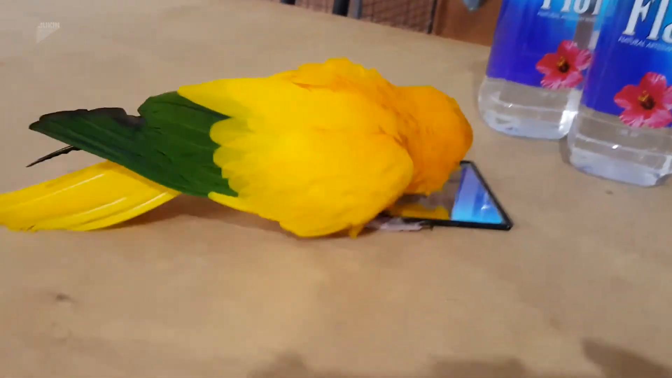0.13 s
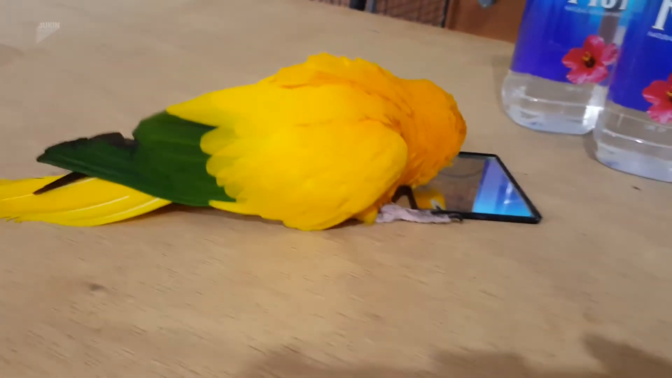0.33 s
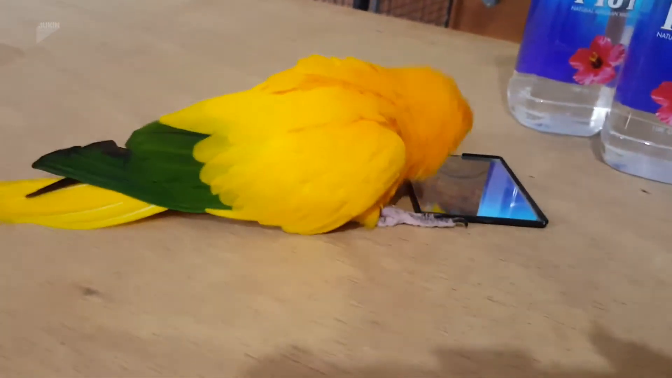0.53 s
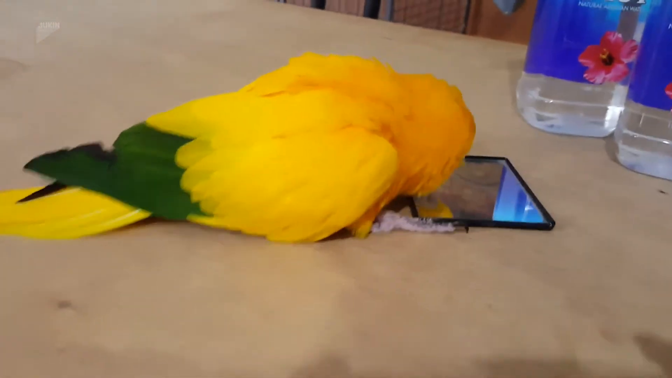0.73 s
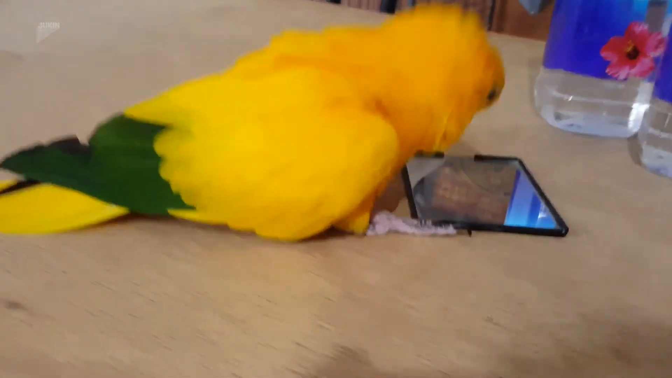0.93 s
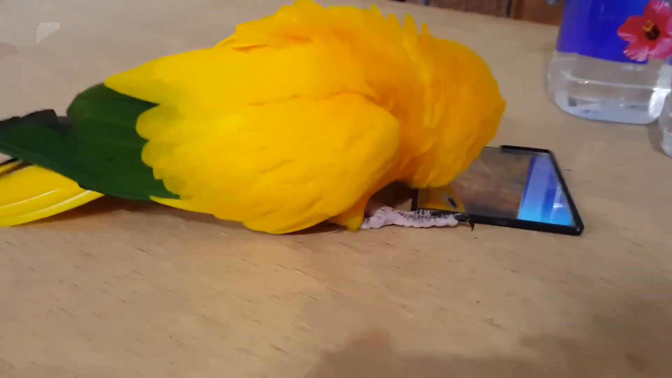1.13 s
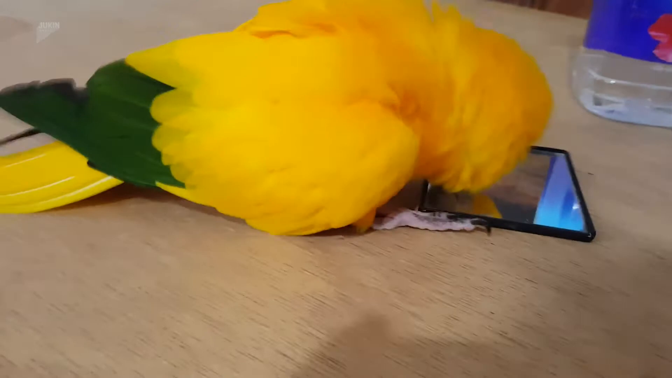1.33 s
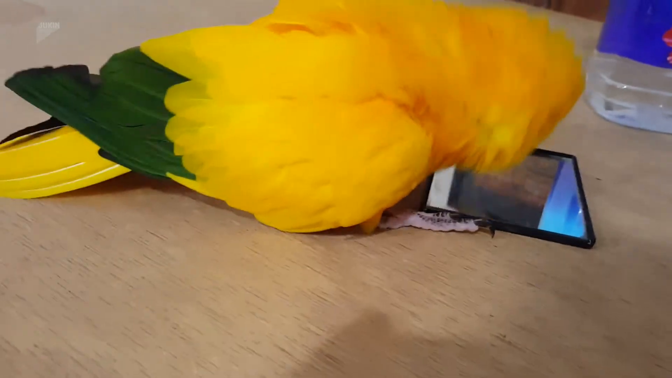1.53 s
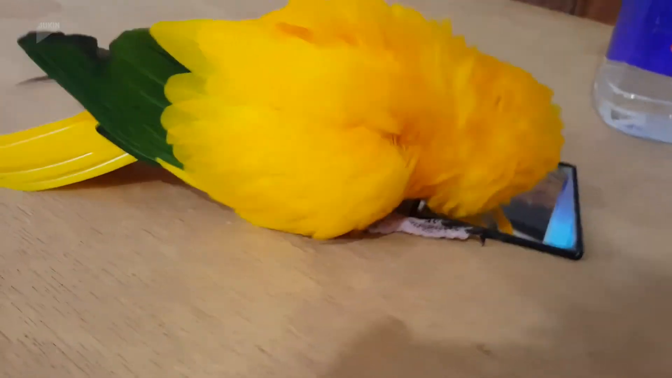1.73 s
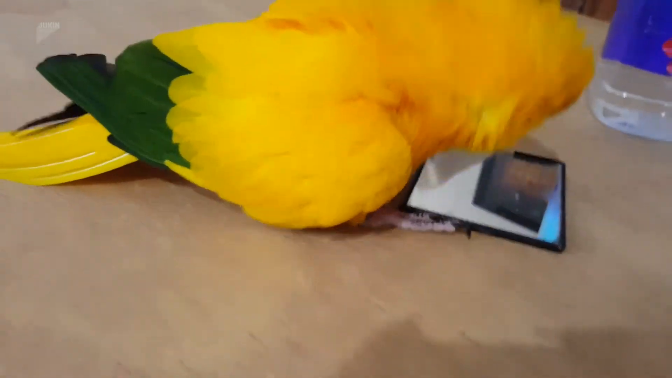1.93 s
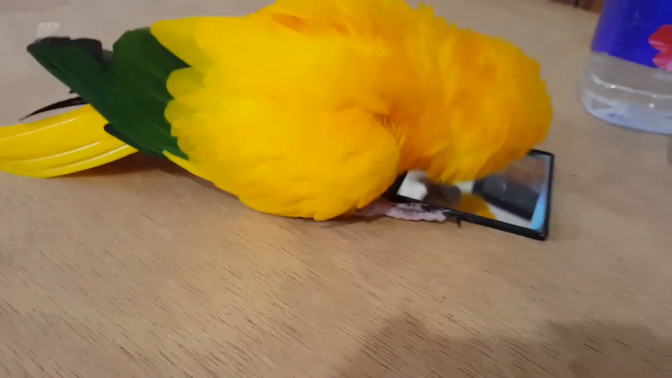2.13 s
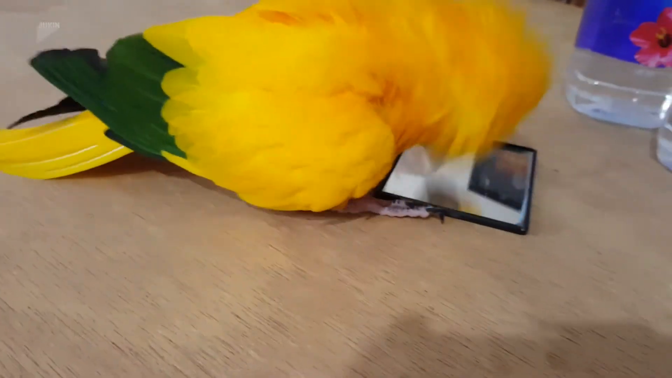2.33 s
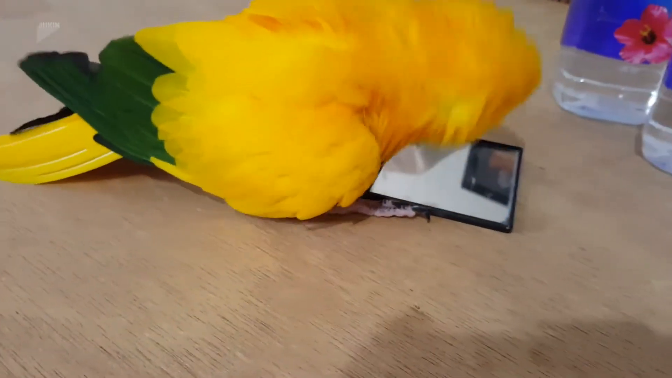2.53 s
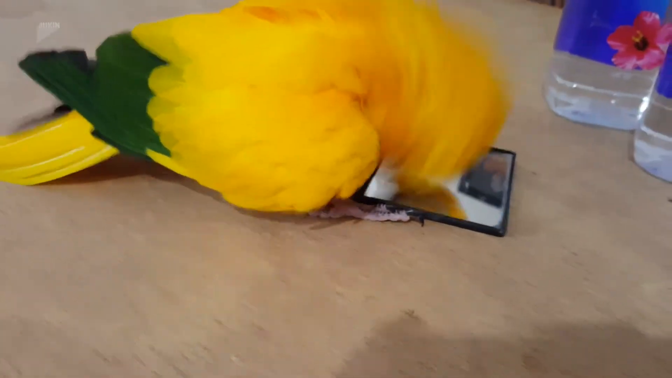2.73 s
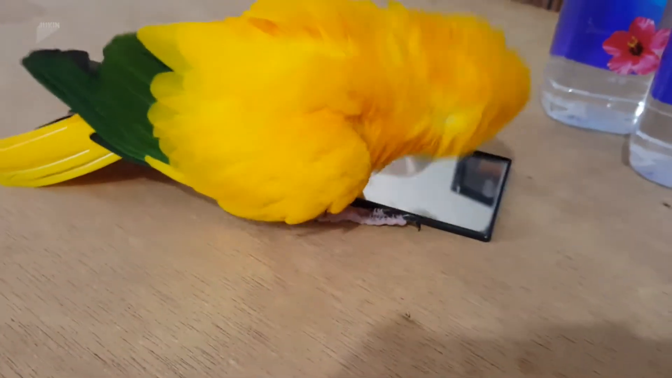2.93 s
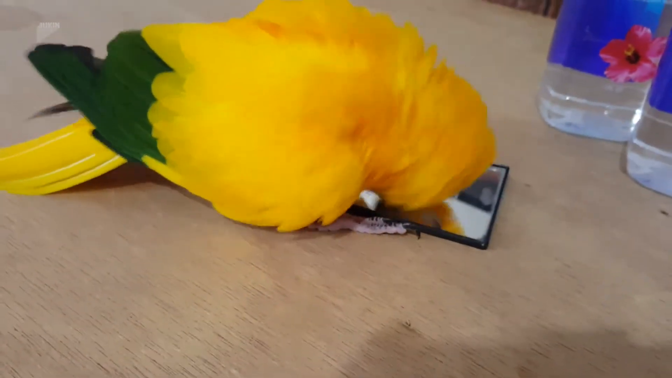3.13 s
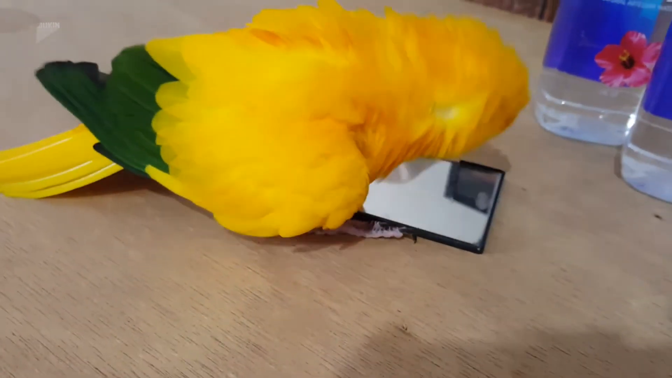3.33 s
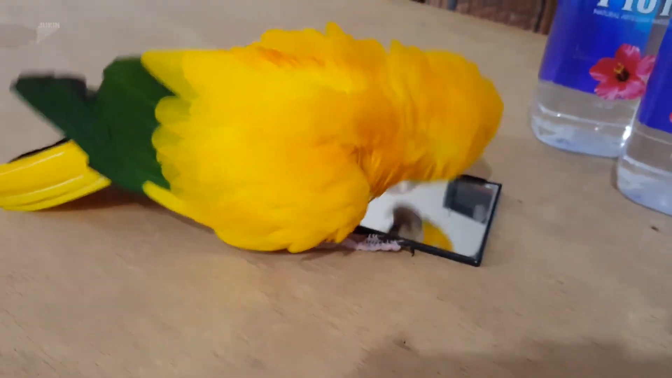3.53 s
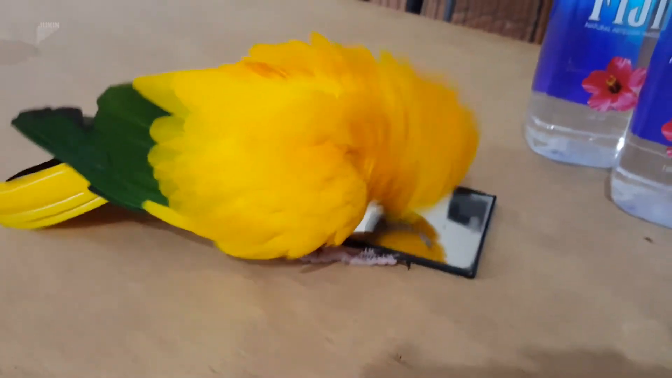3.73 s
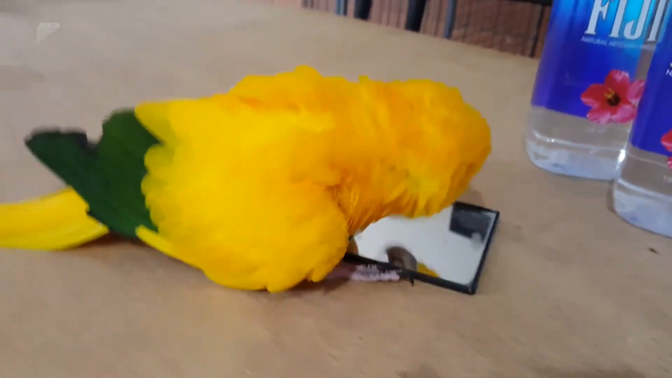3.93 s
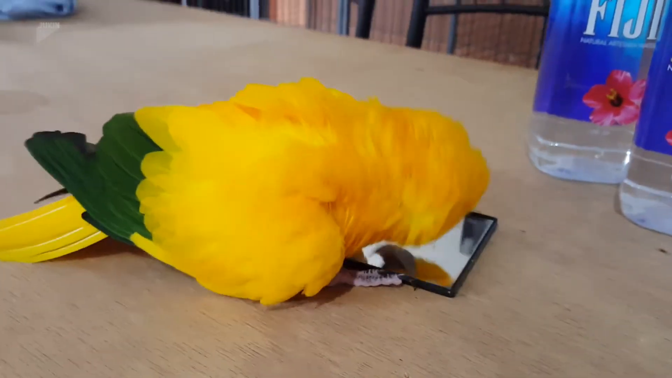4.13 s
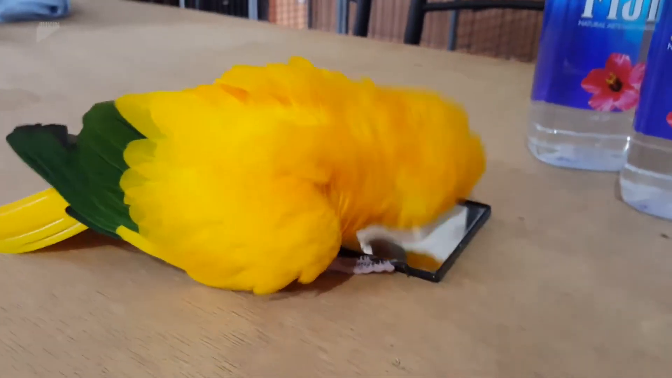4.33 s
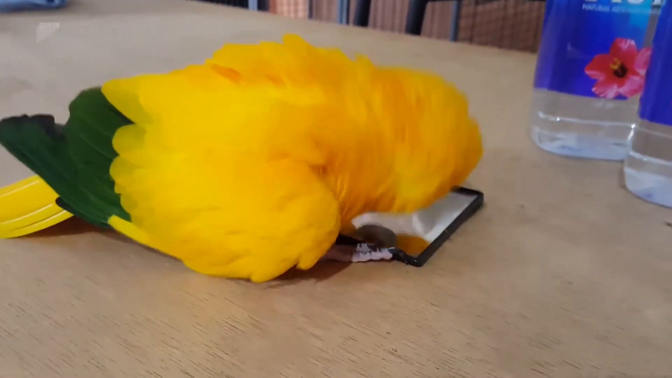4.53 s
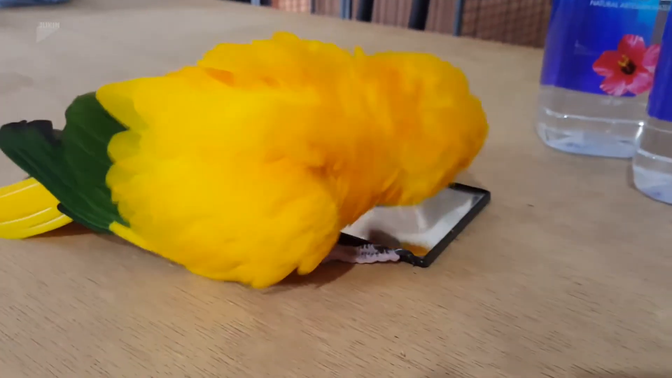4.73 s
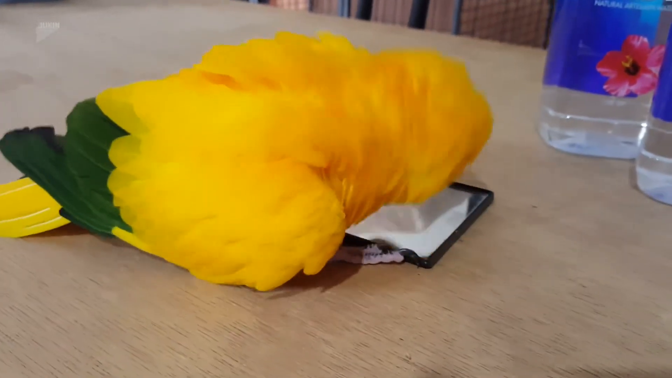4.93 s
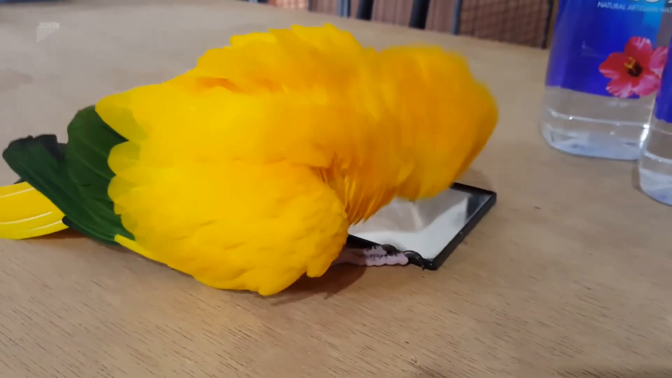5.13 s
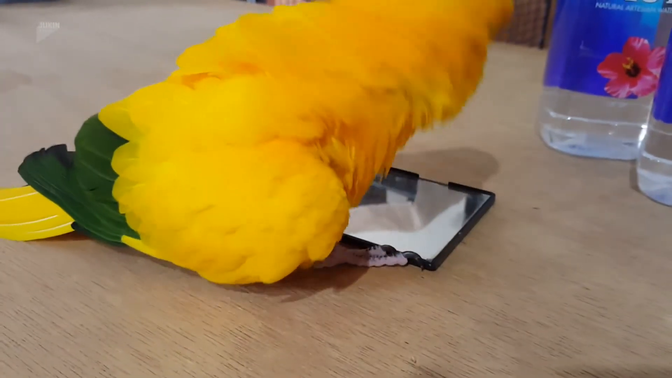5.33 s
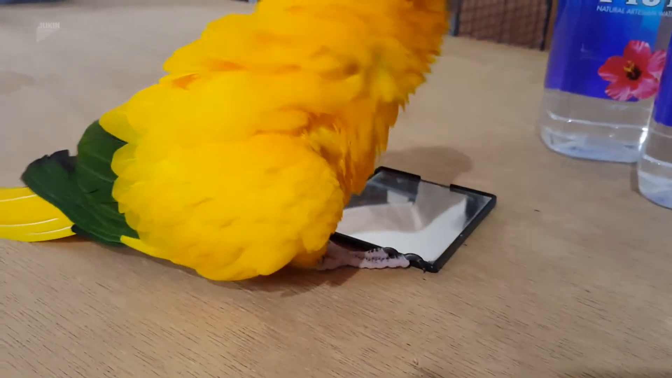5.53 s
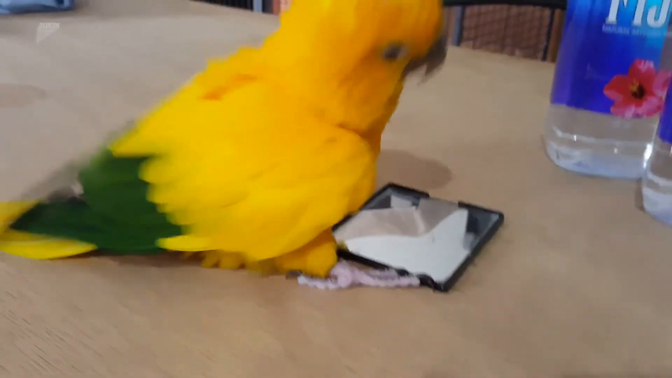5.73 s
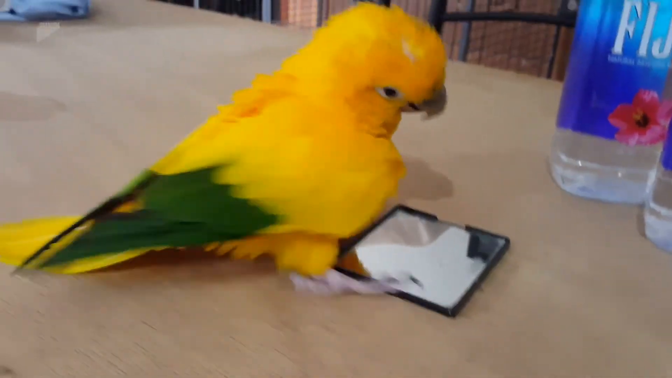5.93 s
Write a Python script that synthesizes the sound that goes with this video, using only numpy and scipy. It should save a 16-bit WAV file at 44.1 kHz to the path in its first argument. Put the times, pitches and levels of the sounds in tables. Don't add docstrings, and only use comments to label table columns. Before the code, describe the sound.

Close up in a bare, lively room, a parrot shuffles on a wooden table with faint claw ticks and beak nips. A small mirror tips and its back clatters on the wood. Sharp beak raps follow about three a second, clicking glass and frame over short table thumps. A faint peep slips between late raps, then one squawk. A distant appliance hums throughout, picked up by a hand-held stereo device at arm's length.

```python
import sys
import numpy as np
from scipy import signal
from scipy.fft import rfft, irfft, next_fast_len
from scipy.io import wavfile

SR = 44100
rng = np.random.default_rng(int(sys.argv[2]) if len(sys.argv) > 2 else 0)


def generate_wav(signal):
    frames = np.transpose(np.atleast_2d(signal))
    scaled = np.clip(frames, -1, 1) * 32767
    pcm = np.round(scaled).astype(np.int16)
    wavfile.write(sys.argv[1], SR, pcm)


N = 268172
GRID = 8192

# start in seconds, peak in dB, table thump in dB,
# hardness of the contact in dB, spot on the glass from centre (-1) to rim (1).
RAP_BLOWS = [(1.4216, -8, 3, -11.5, -1.62), (1.7533, -4, 1.3, -3.5, 0.39), (2.0967, -5.5, 3, 5.5, -0.86),
             (2.4445, -5.5, -3.5, -3, 0.61), (2.8229, -5.5, -1, 7.5, -0.32),
             (2.8374, -15.5, 10.5, -13, -0.85), (3.1773, -2.5, -3, 2.5, -0.15), (3.551, -6, -3, 0.5, 0.045),
             (3.8207, -11, 5, 13.5, -0.33), (4.0697, -10, 4.5, -1, -0.052), (4.2963, -14.5, 0, -5, 0.73),
             (4.3155, -37, 22.5, 10, 0.062), (4.352, -40, 10, 3.5, 0.66), (4.5, -12, 3.5, 11, 0.74),
             (4.6909, -12, 1.5, 2, 0.22), (4.9, -20, 9.5, 1.5, 0.3), (4.9203, -39.5, 21.5, 3, 0.31),
             (5.1192, -24.5, 4, -7, -0.41)]
# pitch in Hz, level in dB, t60 in seconds, left-right in dB.
TABLE_MODES = [(122.8, -19.5, 0.093, 1), (166.6, -25, 0.37, 0), (223.7, -30.5, 0.12, -1.5),
               (252.5, -20, 0.082, 3), (410, -23, 0.055, -0.5), (474, -16.5, 0.034, 0.5),
               (525.6, -16, 0.057, 3), (590.3, -22.5, 0.13, 1), (673, -19, 0.051, 1),
               (779, -23.5, 0.053, -4.5), (1050, -17.5, 0.016, 3)]
# time in seconds, left-right in dB, edge facing the ports in dB,
# rim facing the ports in dB.
DEVICE_AIM = [(0, 1, -1, 5), (1.1, -6, -5.5, 2.5), (1.42, -4.5, 10, 4.5), (1.75, -3, 4, 11),
              (2.1, -3.5, -5, 10), (2.8, -4.5, -1, 12), (3.2, -2, -8.5, 0.5), (3.55, -6.5, -7, 4.5),
              (3.85, -4, 1, 7), (4.3, -6, 1.5, -16), (4.55, -6.5, 5, 12), (4.9, -5, 3, 0),
              (6.08, -7.5, 2, -3)]


def from_db(db):
    return np.exp(np.asarray(db) * (np.log(10) / 20))


def rms_one(x):
    return x / np.sqrt(np.mean(x ** 2) + 1e-20)


def in_time(rows):
    s, *columns = np.transpose(rows)
    return [np.interp(np.arange(N) / SR, s, c) for c in columns]


def at_hz(points, hz):
    table_hz, values = np.array(points)[:, 0], np.array(points)[:, 1]
    return np.interp(np.log(np.maximum(hz, 1)), np.log(table_hz), values)


def governed_db(rows, ranges_hz, s, hz):
    times, *columns = np.transpose(rows)
    return sum((low <= hz < high) * np.interp(s, times, c) for (low, high), c in zip(ranges_hz, columns))


def drift(rate):
    r = np.exp(-80 * np.pi * rate / SR)
    slow = signal.lfilter([1], [1, -2 * r, r * r], rng.standard_normal(N // 40 + 2002))[2000:]
    return np.interp(np.arange(N) / 40, np.arange(len(slow)), rms_one(slow))


def ring(clicks, hz, t60):
    r = from_db(-60 / (t60 * SR))
    w = 2 * np.pi * hz / SR
    return signal.lfilter([0, np.sin(w)], [1, -2 * r * np.cos(w), r * r], clicks + 1e-18)


def causal(gain):
    cepstrum = irfft(np.log(gain), GRID)
    cepstrum[..., 1:GRID // 2] *= 2
    cepstrum[..., GRID // 2 + 1:] = 0
    return irfft(np.exp(rfft(cepstrum)), GRID)


def diffuse(size):
    # frequency in Hz, left-right likeness of diffuse sound from -1 to 1.
    likeness = [(25, .85), (60, 0.98), (290, 0.91), (640, 0.43), (1400, -0.13), (15000, -0.059)]
    hz = np.fft.rfftfreq(size, 1 / SR)
    mid, side = rfft(rng.standard_normal((2, size)))
    alike = np.clip(at_hz(likeness, hz), -1, 1)
    return hz, np.sqrt(1 + alike) * mid + np.sqrt(1 - alike) * side * [[1], [-1]]


def wash(spectrum):
    size = next_fast_len(N, real=True)
    hz, pair = diffuse(size)
    return rms_one(irfft(pair * from_db(at_hz(spectrum, hz)), size)[:, :N])


def strikes(rows, scatter_db, back_db, room_db):
    # pitch in Hz, level in dB, t60 in seconds, left-right in dB.
    back_modes = [(1228, -6.5, 0.025, 3), (1572, -9, 0.037, 10.5)]
    frame_modes = [(1900, -5, 0.013, -1), (2250, -5, 0.022, 1), (2388, 4, 0.0064, -5.5),
                   (2896, 8.5, 0.0046, -4)]
    middle_modes = [(4040, -6.5, 0.0056, 4.1)]
    glass_modes = [(4880, -3.5, 0.0069, -10.5), (5550, -12.5, 0.008, 0.5), (6300, -8, 0.0032, 2.5)]
    rim_modes = [(7440, -12.5, 0.006, 5), (8280, -11, 0.0061, -1.5)]
    edge_modes = [(9800, -3, 0.00088, 12), (11000, -9, 0.0039, -18), (12240, -5, 0.0044, -4.5),
                  (16000, 3, 0.005, -6.5)]
    flank_modes = [(2663, -10, 0.01, 0), (3350, -10, 0.0032, 4)]

    # time in seconds, low frame, mid frame, high frame and middle in dB.
    beam = [(1.08, 5.5, 0, -1, 0), (1.42, 2, 1.5, 5.5, -4.5), (1.75, -1.5, -5.5, 2.5, 0),
            (2.1, -3.5, -1, -0.5, -5.5), (2.44, -2, -5, 2.5, 0), (2.82, 2.5, 1.5, 2, 3),
            (3.18, 0, 0.5, 2.5, 2.5), (3.55, 0.5, 1, 2.5, -2), (3.82, -6.5, -7, -3, 5),
            (4.07, -1.5, -1, 4.5, -6), (4.3, 2, 5, 5.5, 4), (4.5, -3, 1.5, 1, 7), (4.69, -3, 9.5, -2, 8.5),
            (4.9, -1.5, 3.5, 3, -4), (5.12, 1, 3, 1.5, -8.5)]
    # time in seconds, upper table knock, back, frame, upper glass in dB.
    spill = [(1.08, 6, 3, -0.5, -3), (1.42, 4.5, 4.5, -3, -1.5), (1.75, 0.8, 2.5, -3, 4),
             (2.1, 4, 3.5, -2.5, -14), (2.44, -13, 1.5, -3.5, 3.5), (2.82, 3, 3.5, -2.1, 3.5),
             (3.18, 3.5, 1, -1, 4), (3.55, -6.5, 1.5, -1, 4.5), (3.82, -13.5, 3.5, -1.5, 6),
             (4.07, 1, 4, -2.5, -3), (4.3, 0, 2.5, -5.5, 2.5), (4.5, 0, 4, -1, 5),
             (4.69, -1, -2.5, -3.5, 6), (4.9, -2.5, -1.5, -1.5, -3), (5.12, 0, 3, -2, -2)]
    # time in seconds, glass ring, upper glass, edge, top edge in dB.
    sheen = [(1.08, 2.5, 1, -1.5, -1), (1.42, -5, 6, 3.5, 12), (1.75, -5, 1.5, 4.5, 3), (2.1, 1, 0, 3, 4),
             (2.44, -2.5, 1, 3, 10), (2.82, -2.5, 1.5, -0.5, -4), (3.18, 0, 3.5, 2, -3),
             (3.55, 3, 0.5, 0.5, 6), (3.82, -0.8, 5, 0, 2), (4.07, 1.3, 2, 0, -2), (4.3, -3, -2, 2, 10),
             (4.5, -0.5, -7, -2.5, -4), (4.69, 0, 1.5, 2, 3), (4.9, 2, 1, 2.5, -3), (5.12, -1, 0, 0.5, 1.5)]
    # time in seconds, table boom, table body, lower flank, upper flank in dB.
    seat = [(1.08, 1.8, -1, 12, 6), (1.42, -12, -0.5, 14, 8), (1.75, -3, 1, 5, 12),
            (2.1, -3.5, -1.8, -1.8, .1), (2.44, -0.7, -1.8, 4, 4), (2.82, -6, 0, .1, -0.5),
            (3.18, -8.5, 0, -4, 6), (3.55, 2.2, 0.7, 2, 2), (3.82, -1.5, 2.5, 6.5, 4),
            (4.07, -2.2, 0, 6, 4), (4.3, -4.3, -2, -0.8, -3), (4.5, -3, 0.5, .1, -14),
            (4.69, -5.5, 0, -8, -14), (4.9, -6.5, -1.5, 4, -6), (5.12, 0.5, .1, -1.3, 2)]
    # time in seconds, back, second frame mode, low edge, high edge in dB.
    facing = [(1.08, -2, -1, 2.5, 4), (1.42, -1, 5, -3, 6), (1.75, -0.5, .1, 2.5, -2), (2.1, 0.8, 2, 3, -3),
              (2.44, .1, -3, .1, -4), (2.82, -2.5, -9, 5.5, -10), (3.18, -0.5, -3, -4, -1.5),
              (3.55, 0.7, -3.5, -2, .1), (3.82, 1.5, -2, -4.5, .1), (4.07, 2.5, 7, 3, 9),
              (4.3, -1, -5, -4, .1), (4.5, -2.5, 0.5, 2.5, -0.5), (4.69, -1.8, 4, 2.5, .1),
              (4.9, .1, 5, -3, -6), (5.12, 2.5, .1, -1, 1)]
    # time in seconds, rim, edge, top edge in dB.
    halo = [(1.08, .1, 4, 9), (1.42, -3, 0.5, 4), (1.75, -0.2, -3, -3), (2.1, -0.3, -3, -3),
            (2.44, 0.7, -3, -3), (2.82, -0.3, 0, 2), (3.18, 0.5, -2, -2), (3.55, 3.5, -3, -3),
            (3.82, -1, 4.5, 0), (4.07, 0.5, -0.5, .1), (4.3, .1, 2, .1), (4.5, 0.5, 0.3, -0.5),
            (4.69, -3, 2, 0), (4.9, .1, 1, .1), (5.12, -0.3, .1, .1)]
    beam_hz = [(1700, 2300), (2300, 2600), (2750, 3200), (3600, 4400)]
    spill_hz = [(550, 1100), (1100, 1700), (1700, 3200), (5300, 7000)]
    sheen_hz = [(4400, 5300), (5300, 7000), (9000, 13500), (13500, 17000)]
    seat_hz = [(60, 200), (200, 550), (2600, 2750), (3200, 3600)]
    facing_hz = [(1100, 1700), (2100, 2300), (9000, 10500), (11700, 13500)]
    halo_hz = [(7000, 9000), (9000, 13500), (13500, 17000)]

    s, peak_db, thump_db, hard_db, spot = np.transpose(rows)
    near, round_about = np.zeros((2, N + GRID)), np.zeros(N + GRID)
    beamed, power = 0, 1e-14
    chance = rng.standard_normal((len(s), 2, 32))
    aim_s, *aim_columns = np.transpose(DEVICE_AIM)
    aim_db, edge_db, rim_db = (np.interp(s, aim_s, c) for c in aim_columns)
    aim_db = aim_db + 2.5

    # modes, strength in dB, delay in seconds, blur of its decay in the room
    bodies = [
        (back_modes, back_db + 0.67 * thump_db - 0.83 * spot, .0003, .4),
        (frame_modes, 0 * s, .0003, .35),
        (middle_modes, 1.5 + 0.4 * hard_db - 8.5 * spot, .0007, .4),
        (glass_modes[:1], hard_db, .0007, .4),
        (glass_modes[1:], 3 + .2 * hard_db + 0.24 * rim_db, .0007, .85),
        (rim_modes, rim_db + 0.29 * hard_db, .0004, .3),
        (edge_modes, edge_db + 0.57 * hard_db, .0004, .2),
        (TABLE_MODES, thump_db, .0003, .8),
        (flank_modes, 0 * s, .0004, .4)]
    modes = [(mode, *rest) for body, *rest in bodies for mode in body]

    for k, ((hz, db, t60, side_db), extra_db, late_s, blur) in enumerate(modes):
        lean_db = (1700 < hz < 3200) * 3 * spot * 3 * np.log2(hz / 2300)
        level_db = peak_db - 10.5 + db + extra_db + governed_db(seat, seat_hz, s, hz) + lean_db
        spill_db = governed_db(spill, spill_hz, s, hz) + governed_db(halo, halo_hz, s, hz)

        beam_db = governed_db(beam, beam_hz, s, hz) + governed_db(sheen, sheen_hz, s, hz)
        beam_db = beam_db + governed_db(facing, facing_hz, s, hz) + (hz < 1100) * spill_db
        sides = from_db(np.outer([.5, -.5], aim_db + side_db))
        aimed = (-1) ** (k + 1) * sides * from_db(level_db + scatter_db * chance[:, 0, k] + beam_db)
        click = signal.unit_impulse(GRID, round(late_s * SR))
        beamed = beamed + aimed.T[..., None] * ring(click, hz, t60)

        smeared = abs(rfft(ring(signal.unit_impulse(GRID), hz, t60 * blur))) ** 2 / blur
        glass_db = (4400 < hz < 7000) * (2.0 - 0.52 * extra_db + 3.1 * (hz > 5300))
        crack_db = level_db + room_db + glass_db + spill_db + 0.39 * chance[:, 1, k]
        power = power + np.outer(from_db(crack_db) ** 2, smeared)

    for at, rings, crack in zip((s * SR).astype(int), beamed, causal(np.sqrt(power))):
        near[:, at:at + GRID] += rings
        round_about[at:at + GRID] += crack
    return near[:, :N], round_about[:N]


def glance(near):
    # delay in seconds, left in dB, right in dB.
    glances = [
        (.0033, -18, -18.5),
        (.0085, -17, -18.5),
    ]
    out = near.copy()
    for s, left_db, right_db in glances:
        lag = round(s * SR)
        out[:, lag:] += from_db([[left_db], [right_db]]) * near[:, :-lag]
    return out


def squawk():
    # time in seconds, pitch in Hz, effort in dB, beak closing in dB lost per harmonic,
    # chest in dB given to the fundamental.
    cry = [
        (5.507, 509, -27.5, 19, 1),
        (5.529, 787.5, -34.5, 2.5, 2),
        (5.546, 858.3, -30.5, 1, 2.5),
        (5.594, 736, -28, 1.5, -5),
        (5.69, 680.8, -27, 1.6, -4),
        (5.707, 938.6, -32.5, -0.5, -1),
        (5.716, 868, -30, 0, 1.5),
        (5.725, 559.7, -19.5, 6, 3.5),
        (5.756, 309, -46.5, -4.5, .1),
    ]
    # frequency in Hz, throat gain in dB.
    throat = [(300, -9), (550, -17.5), (750, -1.5), (1400, 0.5), (2200, -1), (2800, -11.5), (3450, -16.5),
              (4200, -13.5), (5600, -21.5), (8000, -49)]
    # frequency in Hz, rasp in dB per Hz.
    rasp = [(300, -43), (900, -48), (2200, -14), (3500, -15), (6000, -10), (7500, -22), (16000, -33)]
    start_s, end_s = cry[0][0], cry[-1][0]
    pitch_hz, effort_db, closing_db, chest_db = in_time(cry)
    t = np.arange(N) / SR
    on = (t > start_s) & (t < end_s)
    count = on.sum()
    closing_db = closing_db[on]

    jitter = .002 * (.4 * drift(60) + drift(300))[on]
    pitch_hz = pitch_hz[on] * (1 + jitter)
    phase = 2 * np.pi * np.cumsum(pitch_hz) / SR
    order = np.arange(1, 15)[:, None]
    press_db = -(order - 1) * np.clip(closing_db, 0, 12)
    harmonic_db = at_hz(throat, order * pitch_hz) + press_db + (order == 1) * chest_db[on]
    tone = (from_db(harmonic_db) * np.sin(order * phase)).sum(axis=0)

    hz = np.fft.rfftfreq(count, 1 / SR)
    puff = rng.standard_normal(N)[on] * (1 + np.cos(phase))
    hiss = rms_one(irfft(rfft(puff) * from_db(at_hz(rasp, hz)), count))
    rasp_in = np.minimum((t[on] - start_s) / 0.06, 1)
    hiss = 0.05 * rasp_in * from_db(-.7 * closing_db) * hiss

    out = np.zeros(N)
    out[on] = (tone + hiss) * from_db(effort_db[on] - 4.5) * signal.windows.tukey(count, .06)
    return out


def peep():
    # start in seconds, length in seconds, pitch in Hz, level in dB, second harmonic in dB.
    note = (4.362, .11, 915, -56, -10)
    s, length_s, hz, db, second_db = note
    u = (np.arange(N) / SR - s) / length_s
    phase = 2 * np.pi * np.cumsum(hz * (1 + .004 * drift(30))) / SR
    fade = from_db(db - 8.3 * u) * np.clip(np.minimum(u, 1 - u) * 10, 0, 1)
    return fade * (np.sin(phase) + from_db(second_db) * np.sin(2 * phase))


def touches():
    # start in seconds, peak in dB, pitch in Hz, table thump in dB.
    claws = [(.0585, -45, 2270, 17.5), (.495, -45.5, 2270, 16.5), (.52, -43, 1480, 5),
             (.545, -39, 1510, -3), (.726, -37, 2120, 1), (.733, -35, 1900, 7), (.743, -35.5, 1480, 16.5),
             (.754, -37, 2000, 14.5), (.762, -38, 2340, 9.5), (.78, -40, 1490, 10), (0.921, -50, 1190, 4)]
    # start in seconds, peak in dB, pitch in Hz, dry snap in dB.
    nips = [(.171, -44, 4940, -6), (.173, -42, 2400, -7), (0.215, -45, 1460, -16), (.235, -52, 7000, -6),
            (.241, -44, 7200, -4), (.468, -46, 1900, -9), (0.288, -50.5, 8500, 9.5), (.291, -52, 14800, 4),
            (.372, -36.5, 1960, -3.5), (.375, -43, 14800, 0), (.333, -53, 8500, 2),
            (0.801, -42.5, 1900, -14), (1.004, -50, 5000, -9), (1.031, -40.5, 1730, -4),
            (1.04, -43, 2300, -16), (4.871, -39, 5260, -5.5), (5.034, -42, 1900, -13),
            (5.044, -51, 5300, -4), (5.261, -36, 1705, -12.5), (5.2615, -44.5, 5180, -14),
            (5.983, -38.5, 5500, -19), (6.048, -44, 4850, -3), (6.068, -45, 4950, -2)]
    claw_snap_db, nip_thump_db = -16, -13
    rows = [(*row, claw_snap_db) for row in claws]
    rows += [(*row[:3], nip_thump_db, row[3]) for row in nips]

    impulse, near = signal.unit_impulse(GRID), np.zeros((2, N + GRID))
    table = sum(abs(rfft(ring(impulse, hz, 0.71 * t60))) ** 2 * from_db(2 * db)
                for hz, db, t60, side_db in TABLE_MODES)
    for s, peak_db, hz, thump_db, snap_db in rows:
        ping = abs(rfft(ring(impulse, hz, 0.00395 + 4.7 / hz))) ** 2
        power = ping + table * from_db(2 * thump_db) + 40.0 * from_db(2 * snap_db)
        pan_db = np.interp(s, *np.transpose(DEVICE_AIM)[:2]) + 1.4
        sides = from_db(peak_db - 2.0 + np.array([[.5], [-.5]]) * pan_db)
        at = int(s * SR)
        near[:, at:at + GRID] += causal(np.sqrt(power)) * sides
    return near[:, :N]


def reflections():
    # frequency in Hz, t60 in seconds.
    room_t60 = [(60, 0.14), (160, 0.67), (420, 0.34), (1100, 0.62), (2900, 0.62), (7700, 0.52),
                (15000, 0.33)]
    # frequency in Hz, energy of the tail in dB.
    room_gain = [(60, -3.5), (300, 2), (1000, -6), (3000, -7), (8000, -10), (16000, -4)]
    # delay in seconds, level in dB.
    echoes = [(.0085, -7.5), (0.0148, -9), (0.024, -21)]
    size = SR
    hz, pair = diffuse(size)
    t, tail = np.arange(size) / SR, 0
    for c in np.log2(np.geomspace(60, 15360, 17)):
        share = np.clip(1 - 2 * abs(np.log2(hz + 1) - c), 0, 1)
        t60 = at_hz(room_t60, 2 ** c)
        swell = 1 - np.exp(-(t / (0.0056 + 2.0 / 2 ** c)) ** 2.3)
        energy = from_db(at_hz(room_gain, 2 ** c)) / np.sqrt(t60 * SR / np.log(1e6))
        tail = tail + irfft(pair * share, size) * swell * from_db(-60 * t / t60) * energy
    dulled = np.array([[.5, 0.34, 0.25], [1, 0.32, 0.13]])
    for s, db in echoes:
        at = round(s * SR)
        tail[:, at:at + 3] += from_db(db - 15.0) * dulled
    return tail


def room(dry, count=4):
    spot = np.arange(N) / SR * 2.8
    out = 0
    for k in range(count):
        away = abs((spot - k + count / 2) % count - count / 2)
        heard_here = dry * np.cos(np.pi / 2 * np.minimum(away, 1))
        out = out + signal.fftconvolve(heard_here[None], reflections(), axes=1)[:, :N]
    return out


def body_drag():
    # time in seconds, body on the table in dB.
    shuffle = [(0, -50), (.18, -59.5), (.61, -57), (1.0, -55.5), (1.18, -50), (1.28, -49.5), (1.58, -40.5),
               (1.72, -44.5), (1.95, -49.5), (2.35, -54), (2.7, -58.5), (3.0, -54.5), (3.4, -56),
               (3.7, -56), (4.3, -55), (4.9, -54), (5.3, -61.5), (6.08, -58)]
    # frequency in Hz, scrape in dB per Hz.
    scrape = [(40, -2.5), (100, 7), (250, 3), (550, -3), (900, -11), (2500, -13), (5000, -67.5)]
    body_db = in_time(shuffle)[0]
    drag = from_db(body_db - 1.5 + 1.9 * drift(34) + 2.9 * drift(3.7)) * wash(scrape)
    rub = from_db(1.6 * drift(20)) * rng.standard_normal(N)
    top = rms_one(sum(from_db(db) * ring(rub, hz, t60) for hz, db, t60, side_db in TABLE_MODES))
    return drag + from_db(body_db - 6.5) * top


def feathers():
    # frequency in Hz, rustle in dB per Hz.
    rustle_colour = [(500, -21), (1500, 6.5), (3000, -3.5), (6000, -5.5), (9000, -24.5), (16000, 1)]
    # start in seconds, level in dB, seconds to the top.
    late_swell = (5.536, -44.5, 0.11)
    # time of the top in seconds, level in dB, seconds to rise 20 dB, seconds
    # to fall 20 dB (negative: goes on swelling slowly).
    preen = [(.06, -60, 6, 0.14), (.32, -54, 0.3, 0.83), (.795, -53.5, 0.28, 0.06), (1.035, -55, 0.06, 1.2),
             (5.75, -60.5, 0.5, 0.4), (6.02, -59, 0.5, -6)]
    # frequency in Hz, slide in dB per Hz.
    silk = [(1000, 3), (3000, -0.5), (5000, -2.5), (6500, -6), (9000, -8.5), (12500, -4), (16000, -0.5)]
    t = np.arange(N) / SR
    slow = t[::40]
    soft_swells = [(s, db - 53, 0.1) for s, db, *rest in RAP_BLOWS] + [tuple(late_swell)]
    flicks = 0
    for s, db, top_s in soft_swells:
        u = np.maximum(slow - s, 0) / top_s
        flicks = flicks + from_db(db) * u * np.exp(1 - u)
    rustle = (from_db(-67) + np.interp(t, slow, flicks)) * from_db(3.1 * drift(30)) * wash(rustle_colour)
    strokes = 0
    for s, db, rise_s, fall_s in preen:
        strokes = strokes + from_db(db - 20 * np.maximum((s - slow) / rise_s, (slow - s) / fall_s))
    return rustle + np.interp(t, slow, strokes) * from_db(1.5 * drift(40)) * wash(silk)


def appliance_hum():
    # pitch in Hz, level in dB rms.
    hum = [(102.3, -68), (301.5, -59.5), (780.6, -81)]
    t = np.arange(N) / SR
    return sum(from_db(db + 3 + 1.5 * drift(3)) * np.sin(2 * np.pi * hz * t + .5 * drift(2)) for hz, db in hum)


def room_tone():
    # frequency in Hz, level in dB per Hz.
    air = [(20, -27.5), (50, -21), (100, -10.5), (140, -8.5), (250, 0.5), (500, -18.5), (750, -6),
           (1200, -23.5), (2300, -28.5), (3500, -26), (6500, -25), (16000, -7.5)]
    return from_db(-61 + 0.5) * wash(air)


def scene():
    # start in seconds, peak in dB,
    # table thump in dB, hardness in dB, spot from -1 to 1.
    clatter = [(1.0815, -17, -3, 0, -0.1), (1.0838, -15.5, 5.5, -18, -0.3), (1.091, -35.5, 13.5, -16, -.4),
               (1.1, -27.5, 8.5, -27, -.4), (1.105, -37.5, 19.5, -6, -0.44), (1.1115, -26, 10.5, -5, -0.39),
               (1.114, -25, 9.5, -14, -0.52), (1.122, -28, 7.5, -18, -0.29), (1.1312, -28, -5, -5, -0.5),
               (1.134, -21.5, -5, -20, -.4)]
    blows = [strikes(RAP_BLOWS, scatter_db=4.0, back_db=-1.37, room_db=-0.96),
             strikes(clatter, scatter_db=6.5, back_db=7.5, room_db=0.1)]
    near, round_about = (sum(part) for part in zip(*blows))
    voice, small = squawk() + peep(), touches()
    far = room(round_about + from_db(-3.0) * small.mean(axis=0) + from_db(6.0) * voice)
    background = body_drag() + feathers() + appliance_hum() + room_tone()
    return glance(near) + small + voice * from_db([[3.5], [2.5]]) + far + background


def port(points):
    # frequency in Hz, gain in dB.
    band_limits = [(15, -14), (45, -4), (80, 0), (15650, 0), (15850, -30), (16900, -33), (17200, -80)]
    hz = np.fft.rfftfreq(GRID, 1 / SR)
    return causal(from_db(at_hz(points, hz) + at_hz(band_limits, hz)))


def band_limit(x):
    return signal.sosfilt(signal.butter(12, 17120, fs=SR, output="sos"), x)


def record(dry):
    # frequency in Hz, gain in dB.
    left_port = [(30, -2), (500, 1), (1000, 0.5), (2000, 0.5), (3500, 3.5), (4500, -1), (6500, -2),
                 (7800, 4.5), (8900, 5.5), (9400, -8.5), (11500, -9.5), (14000, -14), (16500, -47)]
    right_port = [(30, -3), (500, 3), (1000, -4.5), (1700, 0), (2250, 6.5), (3300, -7), (4500, 2),
                  (5200, 7), (6300, 2), (7400, -9), (8000, -27.5), (8500, -13.5), (14000, -12),
                  (15600, -11)]
    ports = np.array([port(left_port), np.roll(port(right_port), 1)])
    heard = signal.fftconvolve(dry, ports, axes=1)[:, :N]
    return band_limit(heard)


dry = scene()
out = record(dry)
generate_wav(out)
```